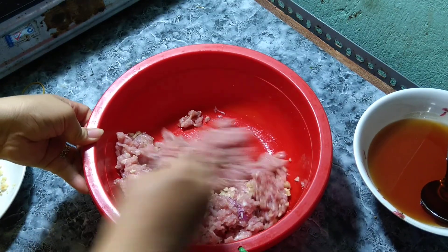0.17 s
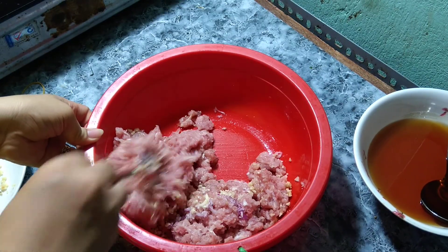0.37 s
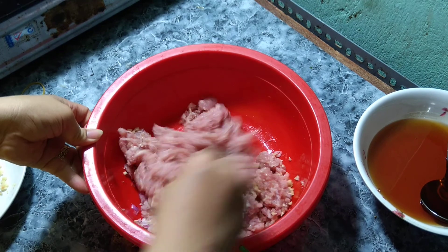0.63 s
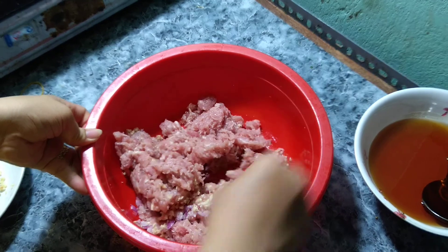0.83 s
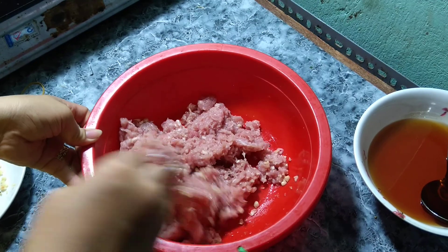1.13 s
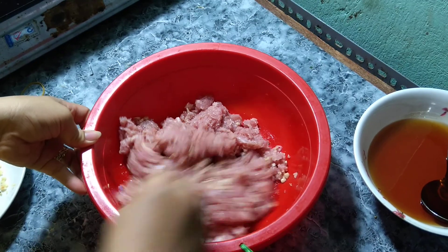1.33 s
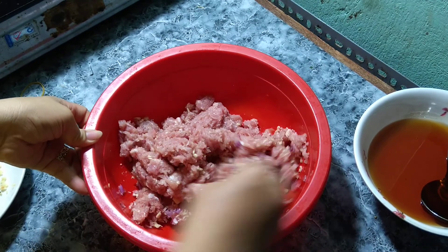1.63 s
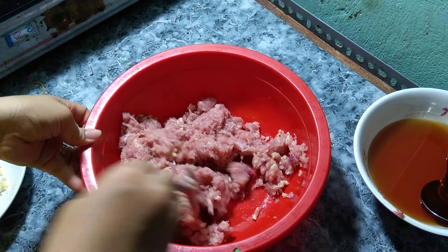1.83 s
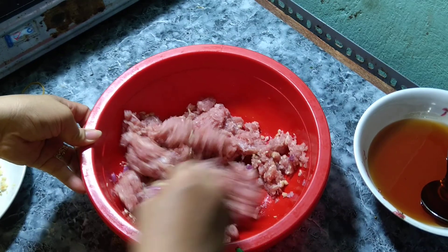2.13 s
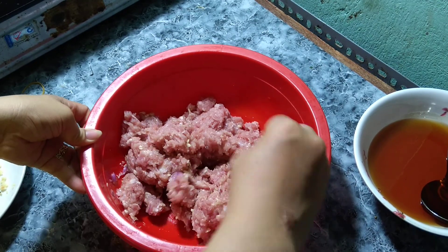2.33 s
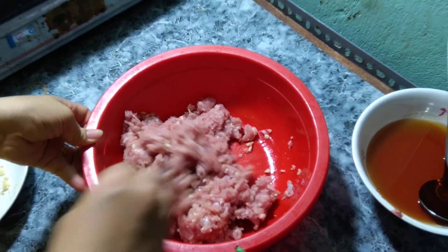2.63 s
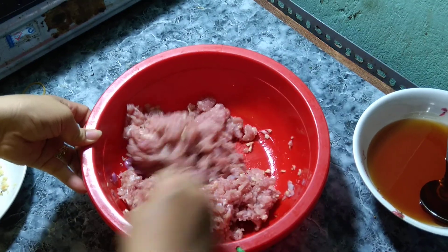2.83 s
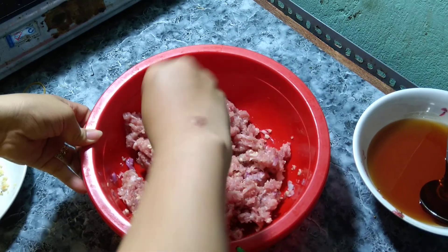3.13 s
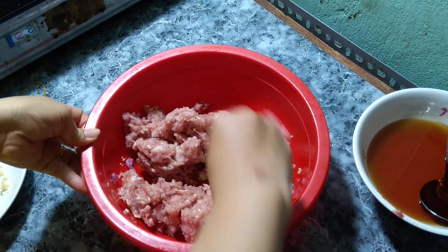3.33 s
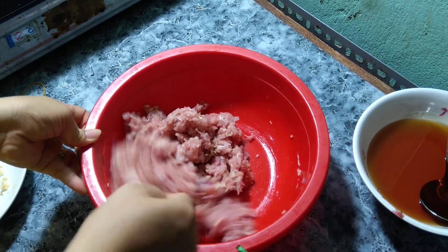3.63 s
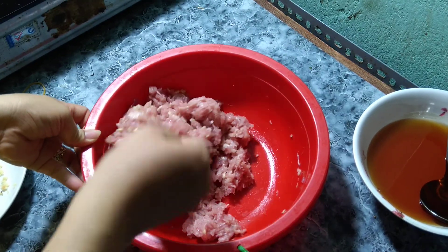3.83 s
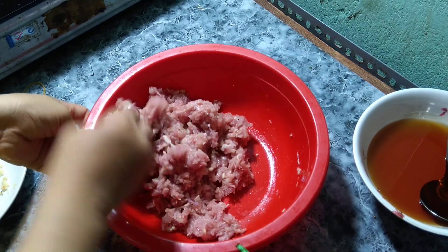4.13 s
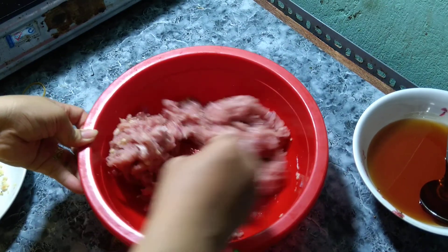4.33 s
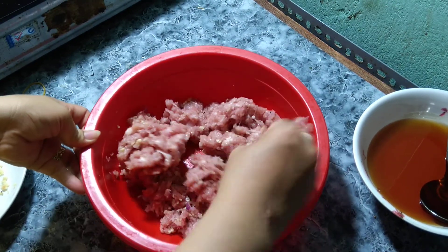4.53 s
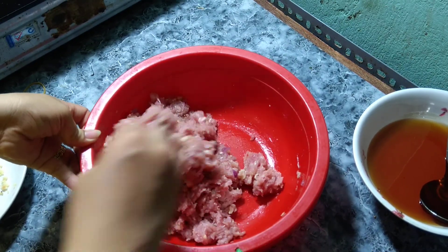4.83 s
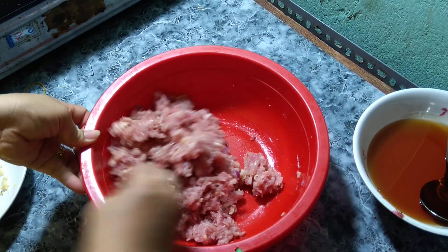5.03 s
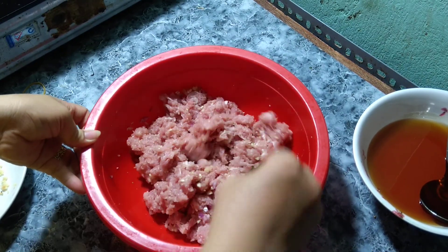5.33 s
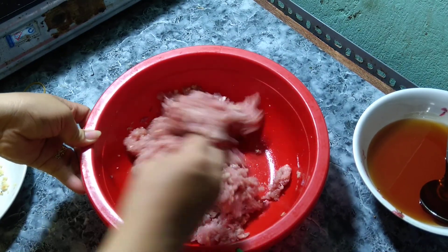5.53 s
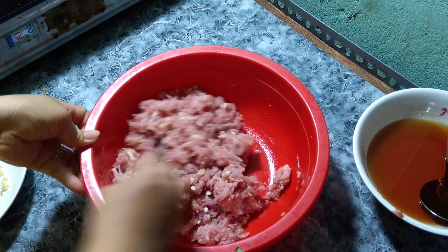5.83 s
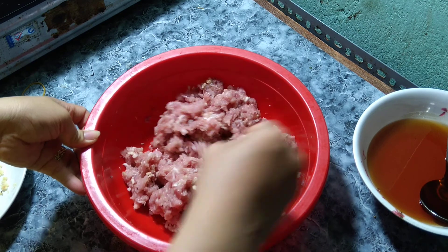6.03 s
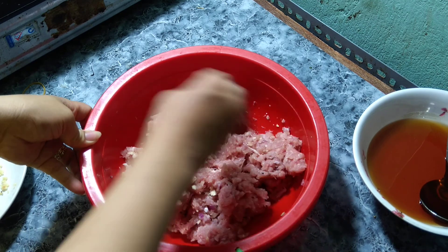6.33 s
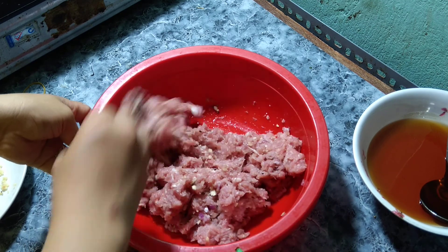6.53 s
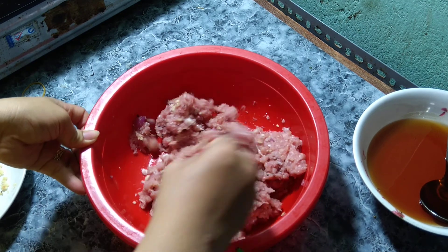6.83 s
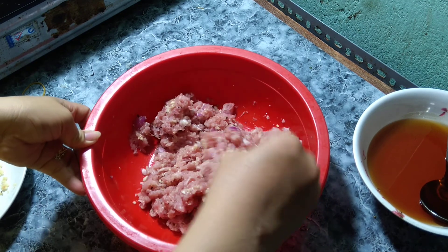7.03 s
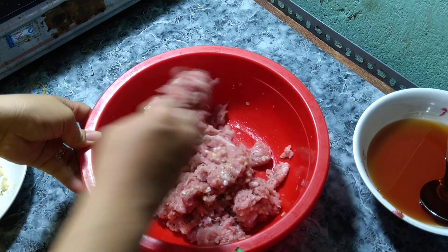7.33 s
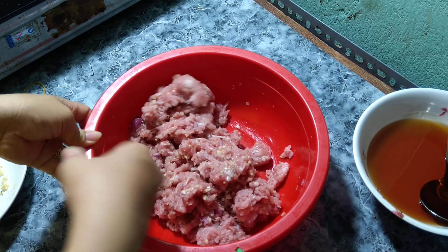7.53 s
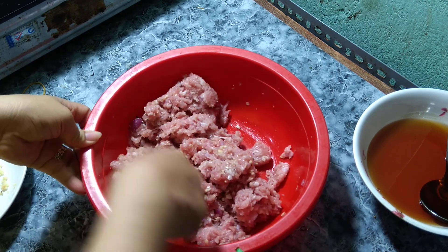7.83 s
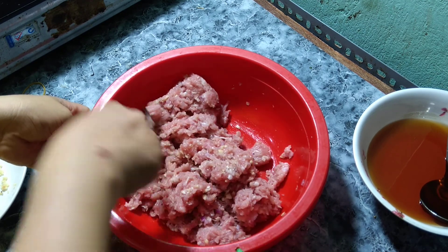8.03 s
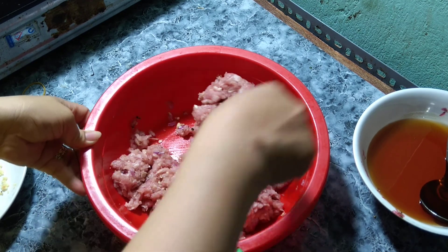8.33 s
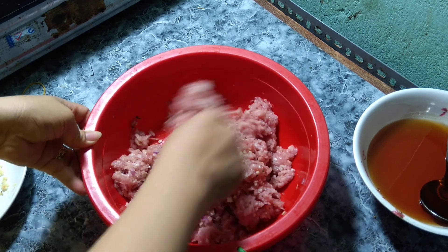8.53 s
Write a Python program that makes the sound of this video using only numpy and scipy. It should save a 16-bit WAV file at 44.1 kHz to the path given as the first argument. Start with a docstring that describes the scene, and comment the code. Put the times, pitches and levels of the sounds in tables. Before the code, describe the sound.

Wet mince is squeezed and turned quickly by hand, each irregular stroke giving a moist squelch, a sticky crackle and a slight rub on plastic. Low rumbling and muffled bumps follow the shoves, with hollow knocks against the counter, strongest near two seconds and recurring later. Brief pops of trapped air punctuate the kneading. The microphone is close, the kitchen small with short reflections, over quiet air and low hum.

```python
"""A hand kneads seasoned minced meat in a plastic bowl on a stone counter in a small kitchen.
A low hum and quiet air lie underneath throughout. From the start clinging meat crackles, the bowl
rumbles as it is shoved about, and each squeeze tears wet films, forces out bubbles and rubs the wall.
Faint narrow tones come now and then; the loaded bowl bumps softly and knocks on the counter.
After the first second larger air pockets burst with short pitched snaps, and the kneading goes on."""
import sys
import numpy as np
from scipy import signal
from scipy.fft import rfft, irfft, next_fast_len
from scipy.io import wavfile
from scipy.ndimage import uniform_filter1d

SR = 44100
rng = np.random.default_rng(int(sys.argv[2]) if len(sys.argv) > 2 else 0)


def pcm_store(signal):
    """Save signal as 16-bit PCM."""
    levels = np.round(np.clip(np.atleast_2d(signal), -1, 1) * 32767)
    wavfile.write(sys.argv[1], SR, levels.astype(np.int16).T)


N = 383229
TIME = np.arange(N) / SR
STEPS = TIME[::64]   # the hand's movements need only a coarse clock

# Steady hum. Each row: frequency in Hz, level in dB.
HUM = [(62, -71.5), (123, -59)]
# Spectrum of the room air. Each row: frequency in Hz, relative density in dB per Hz.
AIR = [(18, -13), (30, -9), (45, -21), (70, 6), (130, 0), (200, 1.5), (280, -12), (400, -26), (750, -34.5),
       (3000, -37.5), (10000, -44.5), (15000, -54)]
AIR_DB = -54.5
# Early echoes from counter and wall. Each row: delay in seconds, relative level in dB.
ECHOES = [(0.0064, -22.5), (0.015, -15.5), (0.0131, -14.5), (.0215, -24)]
# Decay of the kitchen. Each row: frequency in Hz, time to fall by 60 dB in seconds.
KITCHEN = [(150, 0.52), (600, 0.24), (2000, 0.17), (6000, 0.34), (14000, 0.3)]

# The bowl is shoved over the counter. Each row: start in seconds, length in seconds, rumble in dB,
# scraping of the base in dB.
SHOVES = [(0.034, 0.2, -47.5, -64), (0.529, 0.15, -45, -58.5), (0.843, 0.06, -47.5, -87),
          (1.105, 0.1, -46, -68), (1.318, 0.25, -45, -68), (2.06, 0.3, -43.5, -72), (2.42, 0.3, -43, -65),
          (2.761, 0.25, -42, -57), (3.048, 0.26, -42.5, -55), (3.444, 0.081, -47.5, -68),
          (3.632, 0.052, -44, -81), (3.867, 0.13, -47, -70.5), (4.138, 0.06, -44.5, -94),
          (4.383, 0.11, -44.5, -81), (4.852, 0.055, -42.5, -85), (4.996, 0.42, -46, -73.5),
          (5.4, 0.058, -37.5, -73), (5.565, 0.31, -41.5, -61), (5.828, 0.26, -39.5, -62),
          (6.123, 0.15, -38.5, -59.5), (6.309, .36, -42, -65.5), (7.06, 0.38, -42.5, -74),
          (7.475, 0.14, -37, -52), (7.657, 0.23, -40.5, -60.5), (7.992, 0.33, -41, -68.5),
          (8.327, .26, -42.5, -62.5)]
SHOVE_ATTACK_S, SHOVE_FALL_DB_PER_S = 0.023, 143
HELD_RUMBLE_DB = -58   # the held bowl is never quite still
SCRAPE_LOW_HZ, SCRAPE_HIGH_HZ = 215, 490   # the dragging base makes a soft, even rub
# Slow modes of the bowl with its load of meat. Each row: frequency in Hz, width in Hz, relative level in dB.
SWAY = [(74.5, 30, -4), (107, 11, 1), (122.1, 13, -2.5), (147.3, 5.3, -13.5), (176.7, 28, 0.5),
        (211, 49, -6)]
# Pitch of the rumble as the load shifts. Each row: time in seconds, frequency in Hz.
RUMBLE_PITCH = [(0.0, 176), (0.34, 122), (0.51, 198.2), (0.6, 123), (0.87, 134), (0.94, 115), (1.19, 176),
                (1.96, 131), (2.05, 195), (2.25, 124.6), (2.39, 165.6), (2.68, 125.2), (2.76, 182.4),
                (3.07, 124.2), (3.19, 173), (4.06, 118), (4.23, 172), (4.33, 117.4), (4.38, 186.2),
                (4.53, 115), (4.57, 196.5), (4.84, 119), (5.06, 174.6), (5.55, 130), (5.95, 116),
                (6.29, 138), (6.5, 118), (6.75, 118.8), (7.09, 130), (7.3, 140), (7.55, 116), (7.85, 128),
                (8.05, 119), (8.35, 121), (8.69, 132.5)]
# A hard push makes the loaded bowl bump softly. Each row: start in seconds, settled pitch in Hz,
# level in dB, time to full swing in seconds.
BUMPS = [(0.543, 176, -34.5, 0.009), (0.585, 103, -32.5, 0.016), (0.888, 101, -38.5, 0.014),
         (1.193, 177, -34, 0.0089), (1.402, 191, -32.5, 0.0047), (3.106, 135, -31, 0.004),
         (3.21, 185, -33, 0.0044), (3.236, 182, -25, 0.005), (3.9, 104, -36, 0.01),
         (4.394, 152, -37, 0.007), (5.752, 124, -33.5, 0.0083), (5.839, 125, -30, 0.02),
         (5.938, 114, -25.5, 0.0067), (5.988, 122, -27, 0.013), (6.645, 125, -33.5, 0.0095),
         (7.024, 127, -32.5, 0.011), (8.005, 118.5, -35, 0.02), (8.522, 126, -34.5, 0.014)]
BUMP_SAG, BUMP_SAG_S = 0.068, 0.035   # the pitch starts high by this share and sinks as the load settles

# The bowl hits the counter. Each row: start in seconds, strength in dB, pitch of the thud in Hz,
# then relative to the thud in dB the slap and the ringing of the walls, then the ring time as a share
# of the free bowl's, and last the flop of the meat relative to the thud in dB.
KNOCKS = [(0.627, -37, 710, 12.5, -30, 1.0, -25), (1.192, -30, 343, -18, -32, 1.3, -14.5),
          (1.293, -10.5, 457, -21, -29, 0.39, -31), (1.311, -15, 420, -26, -32, 0.5, -25),
          (2.0625, 2, 707, -15, -28.5, 0.7, -25.5), (2.0747, -7, 800, -13, -27, 0.84, -20.5),
          (2.4423, -15, 620, -14, -29, 1.2, -23), (2.786, -17.5, 520, -20.5, -25.5, 1.3, -14),
          (2.93, -28, 1096, 0.5, -29, 0.7, -24), (3.2308, -5.5, 490, -36, -33, 0.9, -33),
          (3.243, -10, 370, -38, -38, 0.73, -23), (3.421, -17, 677, -13, -25.5, 0.98, -23),
          (4.1695, -37, 686, -2, -32, 1.2, -20), (4.192, -6, 656, -26, -33.5, 0.7, -28.5),
          (4.393, -23, 335, -4.5, -35, 1, -23.5), (4.5654, -23.5, 700, -1.5, -22.5, 0.89, -11),
          (4.5944, -7.5, 690, 0, -28.5, 0.98, -27.5), (5.024, -27, 710, -12, -24, 1.1, -23),
          (5.4108, -7, 696, -8.5, -28.5, 1.03, -22), (6.6618, -26.5, 556, -11, -28, 0.83, -19.5),
          (7.133, -15, 694, -12, -25, 1.22, -15.5), (7.266, -28, 743, -18, -28, 0.62, -37),
          (8.113, -4, 678, -20.5, -32.5, 0.81, -29), (8.1254, -16, 597, -24, -31, 0.9, -23),
          (8.229, -21, 710, -9, -33, 1.3, -26.5), (8.6207, -17.5, 665, -17.5, -29.5, 0.83, -23)]
# Ringing modes of the free bowl. Each row: frequency in Hz, relative level in dB,
# time to fall by 60 dB in seconds.
BOWL = [(176, -3, 0.45), (298, 2, 0.07), (370.3, 3.5, 0.17), (486.4, -1, 0.17), (580, -7, 0.13),
        (643, -1, 0.11), (719, 0, 0.15), (771, 0.5, 0.07), (847.4, -1.5, 0.11), (900, -5, 0.1),
        (987, -11, 0.22), (1113, -3.5, 0.26), (1203, 0.5, 0.17), (1490, 1.5, 0.11), (1582, 1.5, 0.14),
        (1782, 0.5, 0.12), (2032, 4, 0.12), (2627, 6, 0.09)]
MODE_SPREAD_DB, MODE_DETUNE = 3.0, 0.004   # the meat lies differently at every blow; detuning is a share
FLOP_S = 0.027   # the meat settles after a blow
# The ringing takes a moment to spread round the wall and reaches each side at its own time.
WALL_RISE_S, WALL_LAG_S = 0.0022, 0.00063

# Faint narrow tones, some just before a knock. Each row: start in seconds, length in seconds,
# pitch at the start in Hz, pitch at the end in Hz, level in dB.
FAINT_TONES = [(0.11, 0.053, 470, 600, -55.5), (3.24, 0.11, 2820, 2740, -61),
               (4.89, 0.094, 1484, 1567, -63), (5.82, 0.045, 790, 808, -58),
               (7.052, 0.094, 490, 493, -56.5), (8.44, 0.063, 745, 798, -64.5)]
FAINT_TONE_WIDTH_HZ = 90
# Air pockets burst. Each row: start in seconds, strength in dB, pitch in Hz,
# spit relative to the snap in dB.
POPS = [(1.233, -22, 9550, -15), (1.517, -17.5, 8900, -13), (1.5355, -32.5, 1930, -17),
        (1.553, -29.5, 3320, -16), (1.603, -36, 1810, -22), (1.7415, -24, 8900, -18),
        (2.0628, -14.5, 1500, -29), (2.131, -22.5, 2320, -26), (2.1502, -25, 1740, -21),
        (2.151, -19, 3530, -25), (2.2786, -39, 1520, -25), (2.4457, -15, 5500, -6),
        (2.5129, -18.5, 3730, -14), (2.515, -17.5, 4200, -37), (2.69, -46, 8700, -26),
        (3.232, -33, 2850, -22), (3.3208, -26.5, 4350, -12), (4.281, -30, 2465, -12),
        (4.5935, -3.5, 3440, -5), (4.657, -16, 3900, -16), (5.023, -36, 1876, -15),
        (5.485, -18.5, 3660, -19), (5.495, -16.5, 3700, -30), (5.499, -18.5, 5220, -23),
        (6.2918, -23.5, 2960, 3.5), (6.304, -22, 3300, -15), (6.543, -31, 7260, 2), (6.948, -26, 9200, 4),
        (7.195, -21.5, 2318, -15), (7.217, -14.5, 5300, -25), (7.507, -17.5, 7800, -7),
        (8.5384, -18, 2016, -22)]

# The fist closes on the meat and slides along the wall. Each row: start in seconds, attack in seconds,
# length in seconds, relative squelch of large pockets in dB, relative crackle of small films in dB,
# resonance of the hollow in the fist in Hz, relative wall rubbing in dB, pitch of the rubbing in Hz.
SQUEEZES = [(0.082, 0.023, 0.035, -69, -63, 2510, -72, 503),
            (0.136, 0.024, 0.12, -50.5, -46.5, 2950, -71, 820),
            (0.518, 0.033, 0.16, -46, -48.5, 1190, -65, 765),
            (0.816, 0.062, 0.2, -63.5, -52.5, 3957, -88, 803),
            (0.989, 0.081, 0.067, -49, -48.5, 2420, -92, 700),
            (1.25, 0.021, 0.11, -51.5, -54, 1680, -69, 443),
            (1.375, 0.02, 0.034, -54, -50.5, 5960, -67, 443),
            (1.524, 0.0042, 0.1, -65.5, -61.5, 1960, -79.5, 364),
            (1.717, 0.059, 0.058, -50, -51, 2270, -101, 705),
            (2.05, 0.0089, 0.13, -44.5, -57, 1170, -59.5, 850),
            (2.433, 0.0092, 0.11, -51, -51.5, 3500, -61, 557),
            (2.8, 0.084, 0.13, -49.5, -48, 2170, -67.5, 620),
            (3.214, 0.015, 0.11, -62, -69, 2900, -59, 580),
            (3.323, 0.041, 0.23, -67.5, -53.5, 4230, -86, 520),
            (3.612, 0.038, 0.17, -51.5, -48, 2880, -100, 632),
            (4.154, 0.019, 0.13, -53, -53, 1770, -68, 496),
            (4.253, 0.028, 0.073, -42, -44.5, 1630, -69.5, 660),
            (4.561, 0.014, 0.17, -45.5, -43, 1950, -68, 789),
            (4.884, 0.056, 0.17, -55, -57, 1370, -100, 815),
            (5.038, 0.048, 0.14, -52.5, -49.5, 2708, -74, 377),
            (5.401, 0.011, 0.15, -50, -52, 2220, -64, 652.5),
            (5.711, 0.014, 0.16, -57.5, -61, 1900, -75.5, 574.5),
            (5.867, 0.044, 0.091, -52, -48, 2900, -95, 784),
            (6.276, 0.011, 0.26, -53.5, -50, 3150, -83.5, 354.4),
            (6.518, 0.19, 0.33, -56, -52.5, 2930, -93, 510),
            (7.118, 0.016, 0.19, -50, -47.5, 2090, -70.5, 721),
            (7.408, 0.082, 0.12, -50, -68, 1180, -65, 771), (7.767, 0.013, 0.075, -77, -73, 1098, -86, 450),
            (8.082, 0.019, .14, -51.5, -46, 1207, -65, 736),
            (8.491, 0.019, 0.13, -45, -41.5, 1950, -61.5, 753)]
SQUELCH_HZ, CRACKLE_HZ = 2514, 7070
# How fast each sound dies when the grip slackens.
SQUELCH_FALL_DB_PER_S, CRACKLE_FALL_DB_PER_S, RUB_FALL_DB_PER_S = 223, 211, 181
HOLLOW_RISE_OCT_PER_S = 0.95   # the hollow shrinks as the fist closes
CRACKLE_LAG_S = 0.0084   # the large pockets go first, the small films tear later
RUB_WIDTH_HZ = 48   # the hand damps the wall modes
# Meat clings to the moving hand until the hand lifts. Each row: start in seconds, length in seconds,
# relative level in dB.
CLINGS = [(0.0, 0.58, -57.5), (0.594, 0.87, -58.5), (1.621, 0.26, -53.5), (1.932, 0.28, -49.5),
          (2.372, 0.51, -54.5), (3.182, 0.84, -57), (4.023, 0.45, -62.5), (4.576, 0.71, -55),
          (5.387, 0.55, -51.5), (6.178, 0.7, -52.5), (7.022, 0.55, -55.5), (8.059, 0.05, -49.5)]
CLING_ATTACK_S = 0.077
# Clinging opens few large pockets. Each row: frequency in Hz, relative level in dB.
CLING_COLOUR = [(2500, -21.5), (4500, -12), (6200, -5), (8000, -0.5)]
# Strength of the wet grains by pitch. Each row: frequency in Hz, relative level in dB.
WET = [(530, -43), (750, -39.5), (950, -38.5), (1250, -23.5), (1600, -17.5), (2200, -20.5), (3050, -14.5),
       (4200, -13.5), (5400, -12.5), (6700, -12.5), (8500, -11.5), (10100, -7), (12100, -18), (15000, -18)]
BUBBLES_PER_S, BUBBLE_CYCLES = 64, 24   # rate during a squeeze; cycles in which a bubble falls by 60 dB
BUBBLE_DB, BUBBLE_RISE = -3, 0.25   # smallest bubble relative to its squelch; pitch rise over one ring
# The hollow of the bowl colours every squelch. Each row: frequency in Hz, width in Hz, relative level in dB.
CAVITY = [(735, 70, 0), (1184, 130, 1.5), (1600, 150, -10), (2060, 52, -12), (3060, 220, -14)]

# The recorder turns down whatever is weaker than this. Each row: frequency in Hz, threshold in dB.
SUPPRESS = [(700, -102), (2500, -93.5), (6500, -80.5), (9000, -87.5), (15000, -100)]
SUPPRESS_DEPTH_DB = -5
CUTOFF_HZ = 15900


def from_db(db):
    """Amplitude ratio: 20 dB stand for a factor of ten."""
    return 10 ** (np.asarray(db) / 20)


def rms_one(x):
    """Normalisation: the mean of the channels gets an effective value of 1."""
    return x / np.sqrt(np.mean(np.atleast_2d(x).mean(axis=0) ** 2) + 1e-20)


def at_hz(points, hz):
    """Interpolation of a table on a logarithmic frequency axis."""
    f, value = np.transpose(points)
    return np.interp(np.log(np.maximum(hz, 1)), np.log(f), value)


def band(x, low_hz, high_hz):
    """Band limitation by a Butterworth band-pass."""
    sos = signal.butter(2, [low_hz, min(high_hz, 0.47 * SR)], "band", fs=SR, output="sos")
    return signal.sosfilt(sos, x + 1e-18)


def colour(x, spectrum):
    """Spectral shaping: each frequency of a steady texture is weighted by a table."""
    size = next_fast_len(N)
    hz = np.arange(size // 2 + 1) * SR / size
    return irfft(rfft(x, size) * from_db(at_hz(spectrum, hz)), size)[..., :N]


def drift(rate):
    """Slow random fluctuation of spread 1, with this many independent values per second."""
    knots = rng.standard_normal(int(N / SR * 400))
    return np.interp(TIME * rate, np.arange(len(knots)), knots) / np.sqrt(2 / 3)


def pan(left_db):
    """Level difference between the ears: gains of left and right, of mean 1."""
    gains = from_db([[left_db / 2], [-left_db / 2]])
    return gains / gains.mean()


def damped(t, hz, t60):
    """Free oscillation of a struck resonance, with exponential decay."""
    return np.sin(2 * np.pi * hz * t) * from_db(-60 * t / t60)


def add(out, s, sound):
    """Superposition of a sound at a given second."""
    at = max(round(s * SR), 0)
    out[at:at + len(sound)] += sound[:N - at]


def clicks(per_s, spread_db, clump_db):
    """Random impulse train: ruptures of uneven size and sign whose size swells in clumps."""
    born = rng.random(N) < per_s / SR
    uneven_db = spread_db * np.minimum(rng.exponential(1, N), 4.5)
    sizes = from_db(uneven_db + clump_db * drift(70))
    return born * sizes * rng.choice([-1, 1], N)


def stereo_noise(spectrum, side_db):
    """Partial coherence: coloured noise, mostly common to both channels."""
    mid, side = rng.standard_normal((2, N))
    return rms_one(colour(mid + from_db(side_db) * side * np.array([[1], [-1]]), spectrum))


def gesture(start_s, attack_s, length_s, fall_db_per_s):
    """Power of one movement: the amplitude grows steadily, holds, then dies away exponentially."""
    t = STEPS - start_s
    rise = np.clip(t / attack_s, 0, 1)
    return (rise * from_db(-fall_db_per_s * np.maximum(t - length_s, 0))) ** 2


def gain_in_time(power):
    """Amplitude as the root of power, brought from the coarse clock to every sample."""
    return np.interp(TIME, STEPS, np.sqrt(power))


def gliding(hz, width_hz):
    """Narrow-band noise: an unevenly excited resonance of moving pitch, with rms 1."""
    phase = 2 * np.pi * np.cumsum(hz) / SR
    return drift(width_hz) * np.cos(phase) + drift(width_hz) * np.sin(phase)


def emphasis(hz, centre_hz, octaves, height_db):
    """Resonance curve: lift in dB that a broad resonance gives to one pitch."""
    return height_db * np.exp(-0.5 * (np.log2(hz / centre_hz) / octaves) ** 2)


def kitchen(x, scatter_db, scatter_s, echo_db, tail_db):
    """Room response: direct sound, scatter inside the bowl, early echoes and a tail that dies by band."""
    t = TIME[:SR // 2]
    scatter = rng.standard_normal((2, len(t))) * np.exp(-t / scatter_s)
    response = from_db(scatter_db) * scatter / np.sqrt(SR * scatter_s / 2)
    edges = np.geomspace(100, 18000, num=9)
    tail = np.zeros((2, len(t)))
    for low, high in zip(edges, edges[1:]):
        t60 = at_hz(KITCHEN, np.sqrt(low * high))
        tail += band(rng.standard_normal((2, len(t))), low, high) * from_db(-60 * t / t60)
    tail *= np.clip(t / 0.0054, 0, 1)
    response += from_db(tail_db) * tail / np.sqrt(np.sum(tail ** 2) / 2)
    response[:, 0] += 1   # direct sound
    for delay, db in ECHOES:
        for side in response:
            side[round((delay + rng.uniform(0, 0.0003)) * SR)] += from_db(db + echo_db)
    return signal.oaconvolve(np.atleast_2d(x), response, axes=1)[:, :N]


def background():
    """Stationary sound: a low hum, wavering in level and phase, in quiet room air."""
    hum = 0
    for hz, db in HUM:
        tone = np.sqrt(2) * np.sin(2 * np.pi * hz * TIME + 0.13 * drift(7.2))
        hum = hum + from_db(db + 0.83 * drift(4.9)) * tone
    return pan(-15.0) * (hum + from_db(AIR_DB) * stereo_noise(AIR, side_db=-6))


def pushing(drag_db=-39, settle=0.59, rocking_db=0.0, rocking_width_hz=10):
    """Friction drives slow modes: dragging rocks the load in lumps; a hard push favours the main mode."""
    shoves = sum(gesture(s, SHOVE_ATTACK_S, length, SHOVE_FALL_DB_PER_S) * from_db(db) ** 2
                 for s, length, db, _ in SHOVES)
    rumble = gain_in_time(shoves + from_db(HELD_RUMBLE_DB) ** 2)
    effort = np.clip((20 * np.log10(rumble) - drag_db) / 10, -1, 1)
    sway = 0
    for hz, width_hz, db in SWAY:
        mode = rms_one(band(rng.standard_normal(N), hz - width_hz / 2, hz + width_hz / 2))
        # the soft load evens out the largest swings
        mode = rms_one(mode / np.sqrt(uniform_filter1d(mode ** 2, size=SR // 12) + 1.6))
        sway = sway + from_db(db + settle * db * effort + 2.4 * drift(9)) * mode
    # the load rocks at a pitch that wanders as it shifts
    rocking = gliding(np.interp(TIME, *np.transpose(RUMBLE_PITCH)), rocking_width_hz)
    rocking = rms_one(rocking / np.sqrt(uniform_filter1d(rocking ** 2, size=SR // 30) + 0.7))
    motion = rms_one(sway) + from_db(rocking_db) * rocking
    return pan(-8.5) * rumble * rms_one(band(motion, 52, 570))


def bumps():
    """Transient of a mass on a compliance: the bowl swings for a few low cycles on its base."""
    out, t = np.zeros(N), TIME[:SR // 4]
    for s, hz, db, swing_s in BUMPS:
        sagging_hz = hz * (1 + BUMP_SAG * np.exp(-t / BUMP_SAG_S))
        phase = 2 * np.pi * np.cumsum(sagging_hz) / SR
        swing = t / swing_s * np.exp(1 - t / swing_s)
        add(out, s, from_db(db) * swing * np.sin(phase))
    return pan(-9.0) * out


def ringing_walls(t, thud_hz, ring_share):
    """Modal superposition: a blow rings the walls, and a soft, low contact leaves upper modes quiet."""
    walls = 0
    for k, (hz, db, t60) in enumerate(BOWL):
        contact = 1 / np.hypot(1, (hz / (1.42 * thud_hz)) ** 3)
        strength = from_db(db + rng.normal(0, MODE_SPREAD_DB)) * contact * (-1) ** k
        lagged = t + rng.uniform(0, WALL_LAG_S, (2, 1))
        walls = walls + strength * damped(lagged, hz * rng.normal(1, MODE_DETUNE), t60 * ring_share)
    return walls * (1 - np.exp(-t / WALL_RISE_S))


def knocks():
    """Impact: the bowl drops on the counter with a damped thud, a slap, ringing walls and a flop of meat."""
    out, t = np.zeros((2, N)), TIME[:SR // 3]
    for s, db, hz, slap_db, ring_db, ring_share, flop_db in KNOCKS:
        thud = damped(t, hz, 0.008) * (1 - np.exp(-t / 0.0011))
        slap = band(rng.standard_normal(len(t)), 1100, 3200) * np.exp(-t / 0.003)
        flop = rms_one(band(rng.standard_normal(len(t)), hz * 0.44, hz * 1.13))
        flop = flop * np.exp(-t / FLOP_S) * (1 - np.exp(-t / 0.0077))
        soft_parts = from_db(slap_db) * slap + from_db(flop_db) * flop
        for side, wall in zip(out, ringing_walls(t, hz, ring_share)):
            add(side, s, from_db(db) * (soft_parts + from_db(ring_db) * wall - thud))
    return pan(-5.5) * kitchen(out, scatter_db=-15, scatter_s=0.008, echo_db=0, tail_db=-9)


def rubbing():
    """Slip excitation: the squeezing hand sounds wall modes near its stroke; each shove scrapes the base."""
    scraping = sum(gesture(s, SHOVE_ATTACK_S, length, SHOVE_FALL_DB_PER_S) * from_db(db) ** 2
                   for s, length, _, db in SHOVES)
    grit = clicks(per_s=2500, spread_db=0.5, clump_db=2.5)
    for _ in range(2):   # two passes steepen the edges
        grit = band(grit, SCRAPE_LOW_HZ, SCRAPE_HIGH_HZ)
    out = gain_in_time(scraping) * rms_one(grit)
    for hz, db, _ in BOWL[2:9]:   # the modes a hand can rub into sound
        slips = clicks(per_s=1500, spread_db=0.5, clump_db=2.5)
        slips = rms_one(band(slips, hz - RUB_WIDTH_HZ / 2, hz + RUB_WIDTH_HZ / 2))
        power = 0
        for s, attack, length, _, _, _, rub_db, rub_hz in SQUEEZES:
            level_db = rub_db + emphasis(hz, rub_hz, octaves=0.2, height_db=6.0)
            power = power + gesture(s, attack, length, RUB_FALL_DB_PER_S) * from_db(level_db) ** 2
        out += slips * from_db(db) * gain_in_time(power)
    return pan(-7.5) * kitchen(out, scatter_db=-7.5, scatter_s=0.00074, echo_db=-17.5, tail_db=-5.5)


def faint_tones():
    """Narrow-band noise of moving centre: each tone is rough and narrow and glides a little."""
    pitch = []
    for s, length, start_hz, end_hz, _ in FAINT_TONES:
        pitch += [(s, start_hz), (s + length, end_hz)]
    power = sum(gesture(s, 0.0057, length, 400) * from_db(db) ** 2 for s, length, _, _, db in FAINT_TONES)
    tone = gliding(np.interp(TIME, *np.transpose(pitch)), FAINT_TONE_WIDTH_HZ)
    return pan(-13.0) * gain_in_time(power) * tone


def pops():
    """Pressure release: a pocket bursts with a short pitched snap and a spit of fine spray."""
    out, t = np.zeros((2, N)), TIME[:SR // 20]
    for s, db, hz, spit_db in POPS:
        for side in out:
            snap = band(damped(t, hz, 7 / hz), hz / 2, hz * 2)
            spit = band(rng.standard_normal(len(t)), 3600, 13000) * np.exp(-t / 0.00065)
            add(side, s, from_db(db) * (snap + from_db(spit_db) * spit))
    return pan(-6) * kitchen(out, scatter_db=-0.5, scatter_s=0.003, echo_db=-9, tail_db=-1.5)


def bubbles():
    """Bubble resonance: squeezes force out rising blips around the pitch of the hollow, most of them small."""
    out, t = np.zeros((2, N)), TIME[:SR // 25]
    for s, attack, length, squelch_db, _, hollow_hz, _, _ in SQUEEZES:
        for when, pitch, size, side in rng.random((round(BUBBLES_PER_S * length), 4)):
            hz = hollow_hz * 2 ** (2 * pitch - 1)
            t60 = BUBBLE_CYCLES / hz
            rising_t = t * (1 + BUBBLE_RISE * np.minimum(t / t60, 1) / 2)
            blip = from_db(squelch_db + BUBBLE_DB + 10 * size ** 2) * damped(rising_t, hz, t60)
            for channel, gain in zip(out, pan(10 * (side - 0.5))):
                add(channel, s + attack / 2 + when * length, gain * blip)
    return out


def in_bowl(x):
    """Cavity resonance: the air modes of the bowl are added to the sound."""
    resonances = sum(from_db(db) * signal.lfilter(*signal.iirpeak(hz, hz / width_hz, fs=SR), x)
                     for hz, width_hz, db in CAVITY)
    return x + resonances


def under_hand(x, scatter_db, scatter_s, echo_db, tail_db, count=5):
    """Time-variant reflection: the moving hand changes the room response 13 times a second."""
    position = (TIME * 13).astype(int) % count
    out = 0
    for k in range(count):
        present = uniform_filter1d((position == k) * 1.0, size=SR // 200)   # short crossfades
        out = out + kitchen(x * present, scatter_db, scatter_s, echo_db, tail_db)
    return out


def tearing(hz):
    """Addition of powers at one pitch: squeezes give squelch and crackle, clinging meat a fine crackle."""
    fine = at_hz([(SQUELCH_HZ, 0), (CRACKLE_HZ, 1)], hz)   # 0 for large pockets, 1 for small films
    fall = (1 - fine) * SQUELCH_FALL_DB_PER_S + fine * CRACKLE_FALL_DB_PER_S
    lag = fine * CRACKLE_LAG_S
    power = sum(gesture(s, CLING_ATTACK_S, length, fall) * from_db(db + at_hz(CLING_COLOUR, hz)) ** 2
                for s, length, db in CLINGS)
    for s, attack, length, squelch_db, crackle_db, hollow_hz, _, _ in SQUEEZES:
        since_middle = np.clip(STEPS - s, 0, length) - length / 2
        hollow = hollow_hz * 2 ** (HOLLOW_RISE_OCT_PER_S * since_middle)
        db = (1 - fine) * squelch_db + fine * crackle_db
        db = db + emphasis(hz, hollow, octaves=0.63, height_db=4.0)
        power = power + gesture(s, attack + lag, length + lag, fall) * from_db(db) ** 2
    return gain_in_time(power)


def meat(per_s=9000, spread_db=0.08, clump_db=1.25, wander_db=2.5, apart=3.6,
         strands_per_s=170, strand_db=-11.0):
    """Impulsive excitation: tearing films ring at a pitch set by size; sticky strands snap at all pitches."""
    pitches = np.geomspace(530, 15000, num=30)
    dealt = rng.integers(0, len(pitches), N)   # which pitch each rupture gets
    # each rupture reaches the two sides with a strength of its own
    ruptures = clicks(per_s, spread_db, clump_db) * (1 + apart * rng.standard_normal((2, N)))
    strands = clicks(strands_per_s, spread_db=2.5, clump_db=-2.5) * (1 + apart * rng.standard_normal((2, N)))
    strands = from_db(strand_db) * strands
    wet = np.zeros((2, N))
    for k, hz in enumerate(pitches):
        excitation = ruptures * (dealt == k) + strands * (-1) ** k
        grains = rms_one(band(excitation, hz / 1.08, hz * 1.08))
        wet += grains * tearing(hz) * from_db(at_hz(WET, hz) + wander_db * drift(18))
    squelch = in_bowl(wet + bubbles())
    return pan(-6.5) * under_hand(squelch, scatter_db=0.0, scatter_s=0.009, echo_db=6.5, tail_db=-2.0)


def scene():
    """Superposition of everything that sounds around the bowl."""
    surroundings = background() + pushing() + bumps() + knocks()
    return surroundings + rubbing() + faint_tones() + pops() + meat()


def suppressor(x):
    """Spectral noise suppression: each narrow band is turned down while it lies under the threshold."""
    hz, _, z = signal.stft(x, SR, nperseg=512)
    power = np.mean(abs(z) ** 2, axis=0)
    for axis in (0, 1):   # smooth over frequency, then over time
        power = uniform_filter1d(power, size=3, axis=axis)
    threshold = from_db(at_hz(SUPPRESS, hz))[:, None] ** 2
    gain = np.maximum(power / (power + threshold), from_db(SUPPRESS_DEPTH_DB))
    return signal.istft(z * gain, SR, nperseg=512)[1][:, :N]


def record(dry):
    """Limits of transmission: faint hiss is suppressed, the highest peaks are clipped, the top is cut."""
    clipped = np.clip(suppressor(dry), -0.75, 0.75)
    low_pass = signal.ellip(10, 0.2, 80, CUTOFF_HZ, fs=SR, output="sos")
    return signal.sosfilt(low_pass, clipped)


dry = scene()
out = record(dry)
pcm_store(out)
```